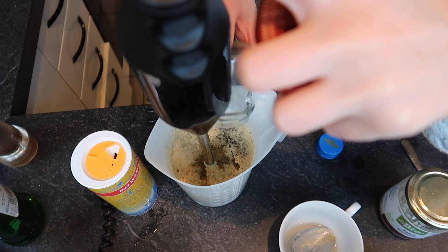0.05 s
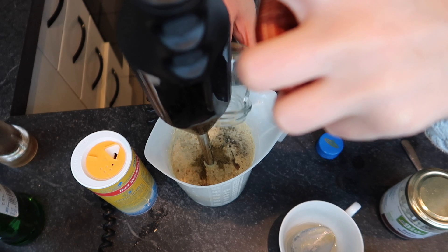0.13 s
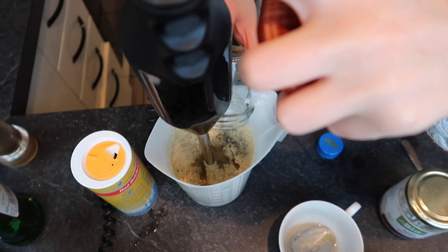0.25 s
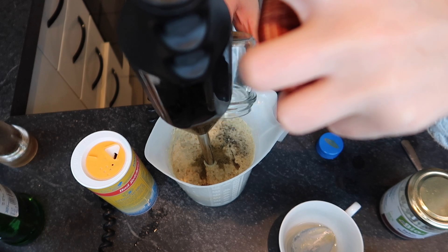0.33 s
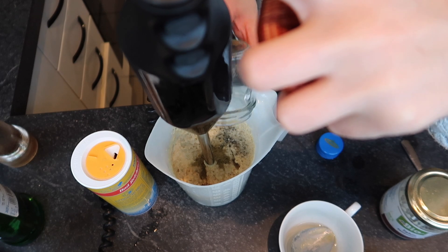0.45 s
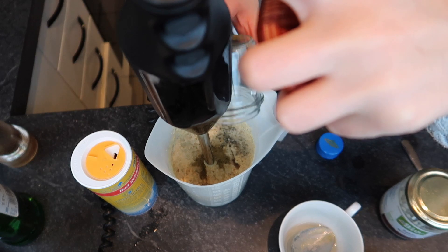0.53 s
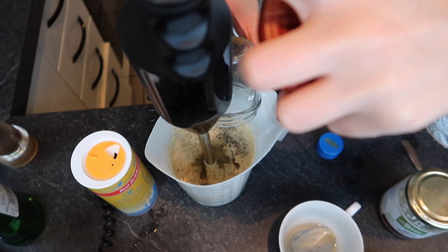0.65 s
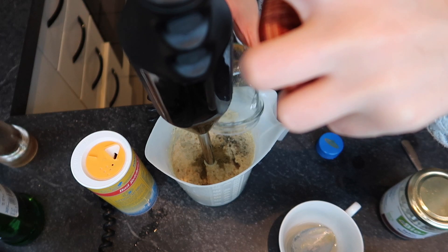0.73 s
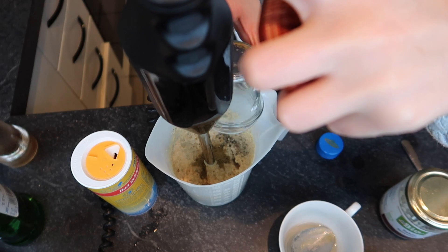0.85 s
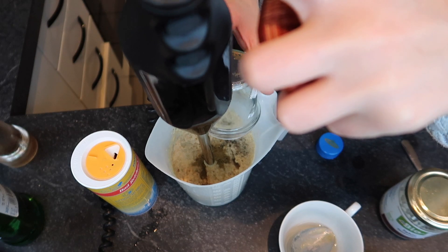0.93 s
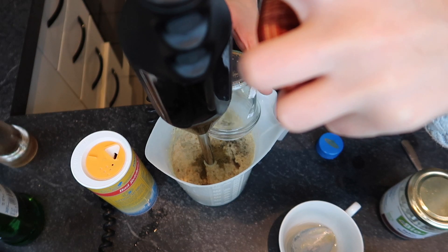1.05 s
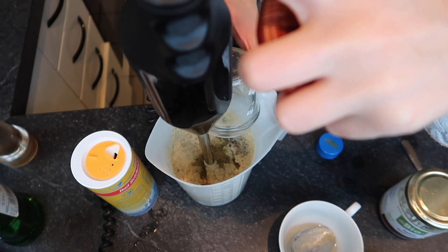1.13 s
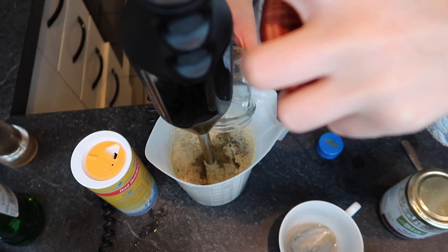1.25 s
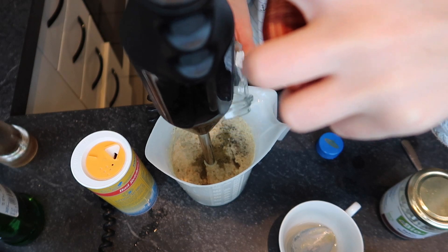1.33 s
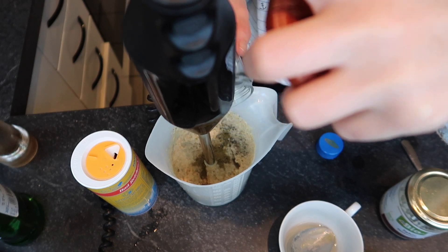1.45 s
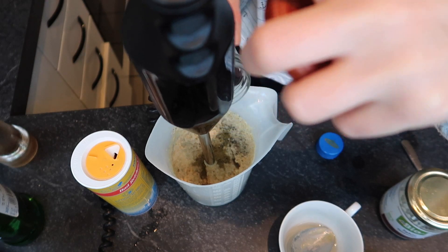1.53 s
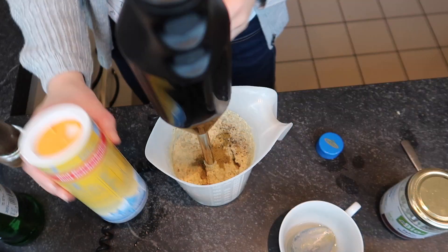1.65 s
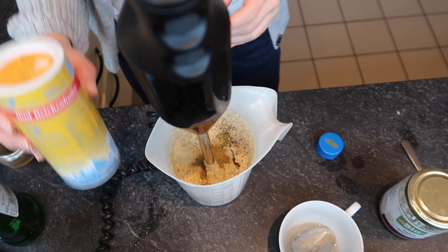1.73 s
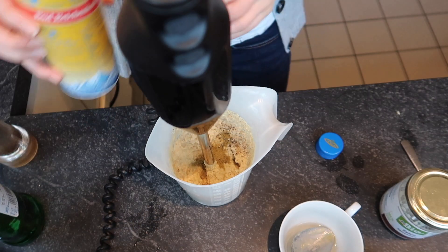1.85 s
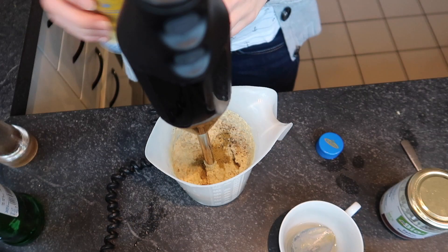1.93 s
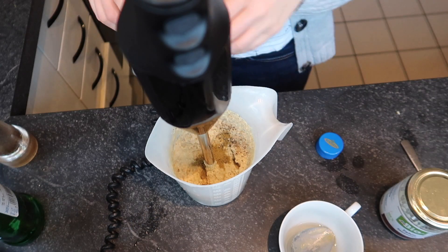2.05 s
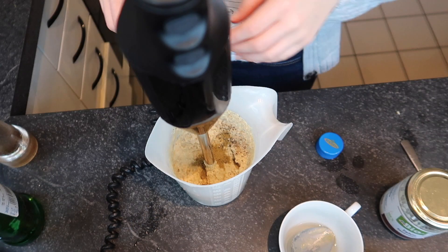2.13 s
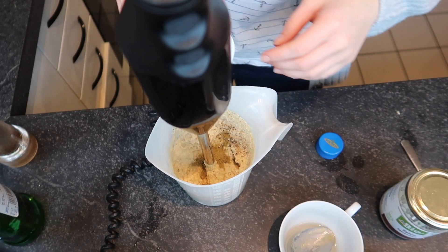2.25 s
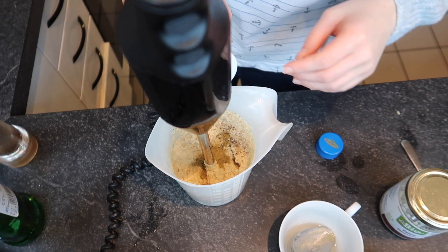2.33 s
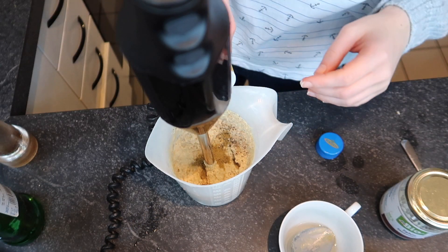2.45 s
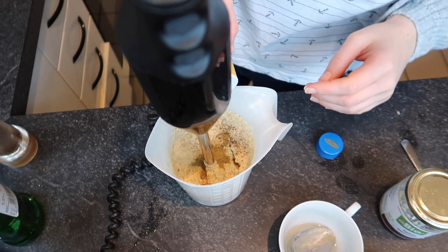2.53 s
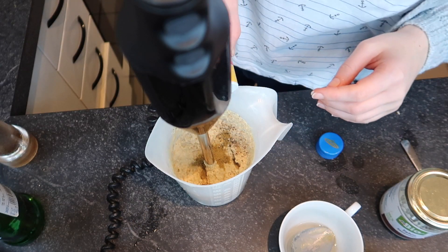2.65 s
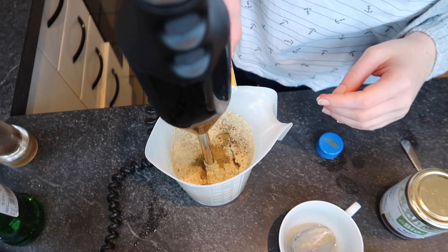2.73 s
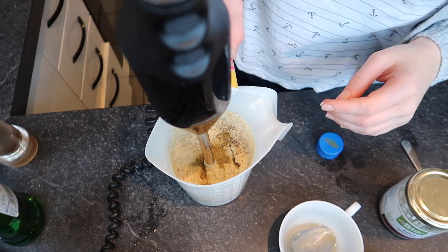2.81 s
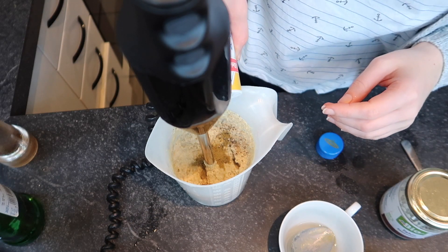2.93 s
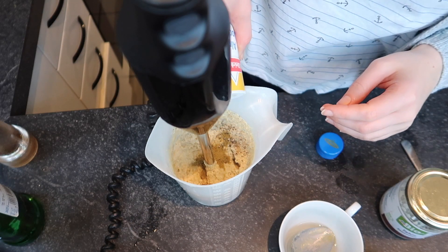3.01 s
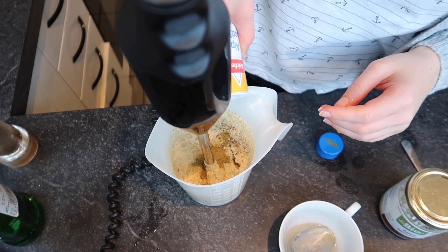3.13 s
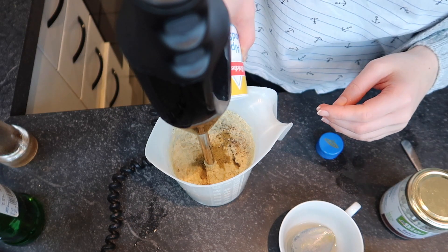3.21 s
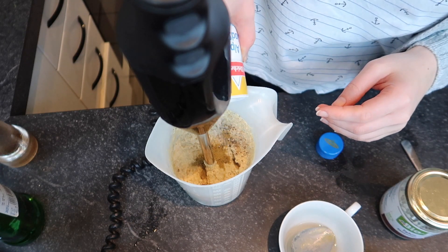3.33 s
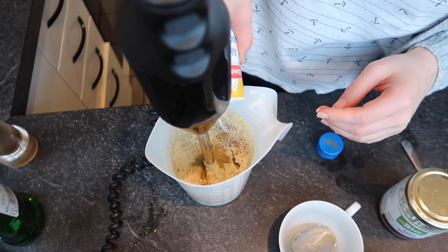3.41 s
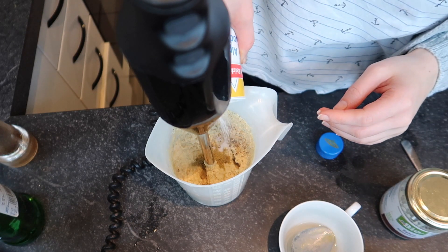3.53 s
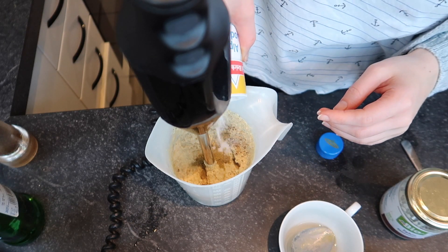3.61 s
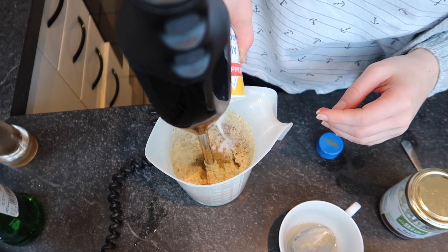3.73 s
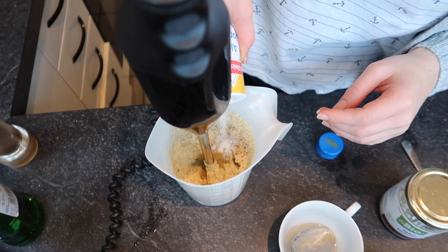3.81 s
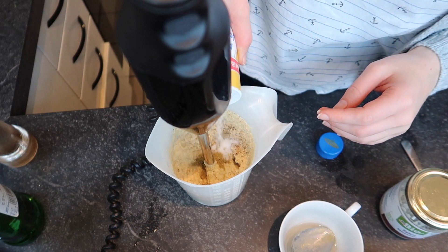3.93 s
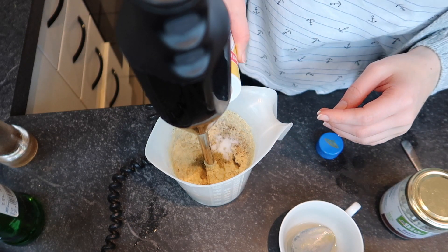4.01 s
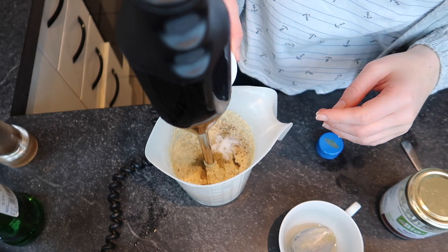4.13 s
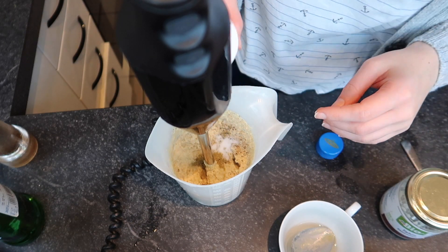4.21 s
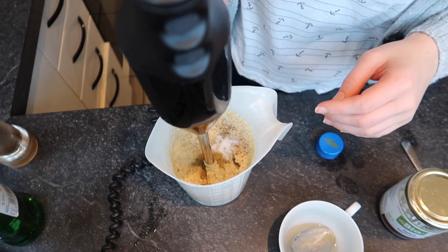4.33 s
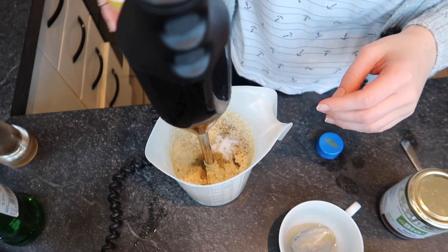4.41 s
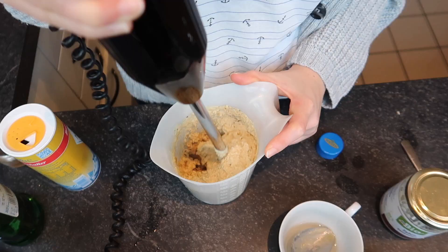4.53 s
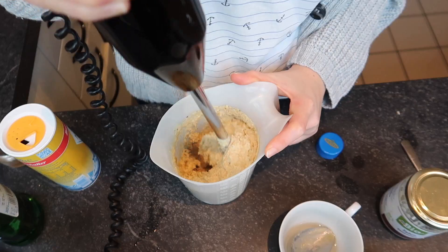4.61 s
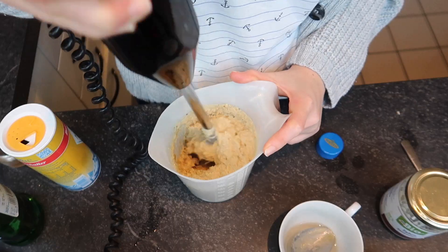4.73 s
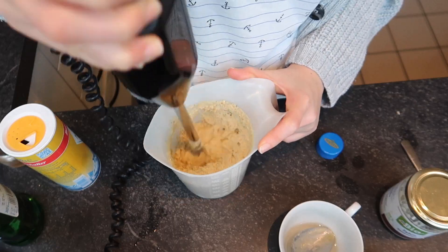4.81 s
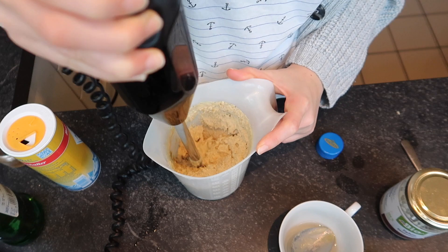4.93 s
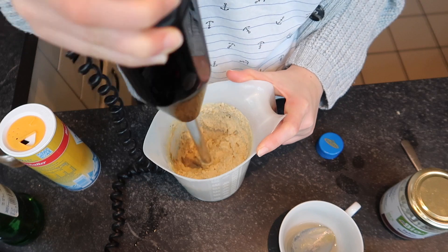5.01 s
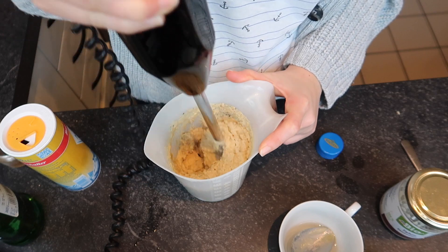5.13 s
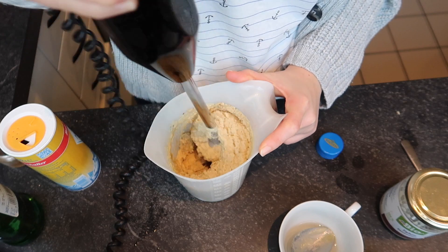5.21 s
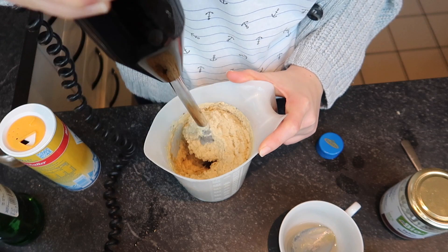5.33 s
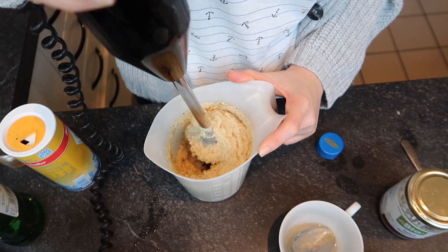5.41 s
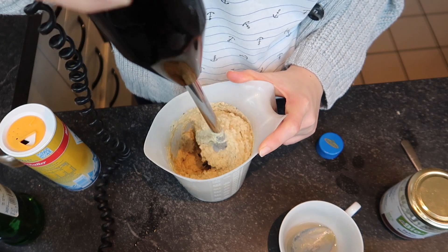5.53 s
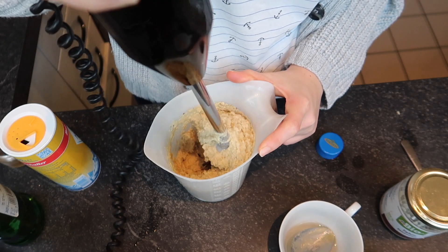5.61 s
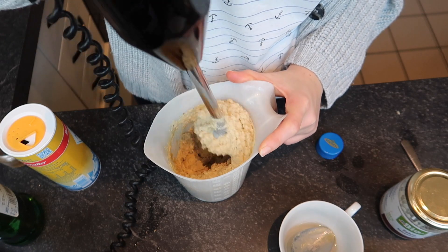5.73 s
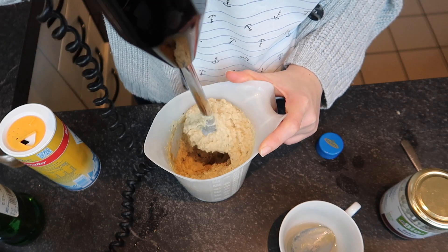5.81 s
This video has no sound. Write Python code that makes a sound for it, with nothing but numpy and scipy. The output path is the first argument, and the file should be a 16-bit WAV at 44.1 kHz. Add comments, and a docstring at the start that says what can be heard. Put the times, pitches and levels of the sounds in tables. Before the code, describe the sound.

Quick dry spice shakes with glassy knocks, soft hollow taps with fine salt fizz, then a loud labouring blender rising to a bright whine.

```python
"""A hand blender starts in thick paste, labours and spins free: harmonics of a loaded shaft, noise and impacts.
Before it, a glass spice jar is shaken over a plastic jug and knocks on the blender: struck modes and grain noise.
After two soft bumps of a handled container, a salt tub is tilted and tapped with a finger, its salt sliding:
the notes of hollows and noise swells.
A small tiled kitchen answers with decaying noise; air noise and, until the blender starts, a low hum lie beneath."""
import sys
import numpy as np
from scipy import signal
from scipy.fft import rfft, irfft, next_fast_len
from scipy.io import wavfile
from scipy.ndimage import map_coordinates

SR = 44100
rng = np.random.default_rng(int(sys.argv[2]) if len(sys.argv) > 2 else 0)


def store_pcm(level_fs):
    """Save levels as 16-bit WAV."""
    pcm = np.round(np.clip(level_fs, -1, 1) * 32767).astype(np.int16)
    wavfile.write(sys.argv[1], SR, np.atleast_2d(pcm).T)


N = 258426

# Table levels are relative: the functions apply further trims and the room.
MOTOR_ON_S = 4.605
FREE_S = 5.32  # the blade comes clear of the paste


def amp(db):
    """Logarithmic level: decibels become a gain."""
    return 10 ** (np.asarray(db) / 20)


def unit(x):
    """Power normalisation: scale to rms 1."""
    return x / np.sqrt(np.mean(x ** 2) + 1e-20)


def along(points, hz):
    """Logarithmic frequency: read (Hz, value) points on a log axis."""
    f, v = np.transpose(points)
    return np.interp(np.log(hz + 1), np.log(f + 1), v)


def clock(size=N):
    """Sampling: the time in seconds of each sample."""
    return np.arange(size) / SR


def curves(rows):
    """Linear interpolation: one value per sample for each column after the time."""
    s, *cols = np.transpose(rows)
    return [np.interp(clock(), s, c) for c in cols]


def wobble(rate):
    """Slow random fluctuation: a smooth curve with rate knots a second."""
    knots = rng.standard_normal(int(N * rate / SR) + 4)
    return map_coordinates(knots, [clock() * rate])


def swell(s, rise, fall, power=2):
    """Asymmetric envelope: peaks at s, 20 dB down one rise before and one fall after."""
    t = clock() - s
    return amp(-20 * np.maximum(-t / rise, t / fall) ** power)


def filtered(x, response):
    """Linear filtering: multiply the spectrum of x by a response of frequency."""
    size = x.shape[-1]
    m = next_fast_len(size + 8192)
    return irfft(rfft(x, m) * response(np.fft.rfftfreq(m, 1 / SR)), m)[..., :size]


def without_bass(x, cut_hz):
    """Radiation cutoff: a small object radiates little far below its lowest mode."""
    return signal.sosfilt(signal.butter(3, cut_hz, "high", fs=SR, output="sos"), x)


# likeness of left and right: frequency_hz, correlation (-1 to 1)
ALIKE = [(200, 0.992), (1000, 0.97), (2300, 0.92), (4000, 0.42), (8000, .25), (13000, 0.04)]


def spread(pair):
    """Interaural coherence: two unrelated signals become a pair alike in the bass, apart in the treble."""
    def mix(hz):
        turn = np.arccos(np.clip(along(ALIKE, hz), -1, 1)) / 2
        return np.array([np.cos(turn), np.sin(turn)])

    mid, side = filtered(pair, mix)
    return np.array([mid + side, mid - side])


def widen(pair, side_db):
    """Mid-side stereo: the level of the difference signal sets the width."""
    mid = (pair[0] + pair[1]) / 2
    side = amp(side_db) * (pair[0] - pair[1]) / 2
    return np.array([mid + side, mid - side])


def grains(colour, clump_db, clump_rate):
    """Granular noise: countless tiny impacts, arriving in clumps, make a stereo rush of rms 1."""
    clumps = amp(clump_db * np.tanh(wobble(clump_rate) / 2) * 1.6)
    impacts = rng.standard_normal((2, N)) * clumps
    return unit(spread(filtered(impacts, lambda hz: amp(along(colour, hz)))))


def add(track, s, sound):
    """Superposition: mix a sound in at s seconds."""
    part = track[..., max(round(s * SR), 0):][..., :sound.shape[-1]]
    part += sound[..., :part.shape[-1]]


def ring(modes, attack, vary_db=2):
    """Modal vibration: one blow excites decaying modes, at new strengths each time; peak 1."""
    t = clock(SR // 2)
    hz, db, t60 = np.transpose(modes)[..., None]
    strength, phase = rng.standard_normal((2, len(modes), 1))
    level = amp(db + vary_db * strength - 60 * t / t60)
    wave = np.sum(level * np.sin(2 * np.pi * hz * t + phase), 0)
    wave *= 1 - np.exp(-t / attack)
    return wave / np.abs(wave).max()


def crack(t60):
    """Contact noise: a short burst of decaying noise."""
    return amp(-60 * clock(SR // 2) / t60) * rng.standard_normal(SR // 2)


def far_wall(x, echo_db, delay, dull_hz):
    """Single reflection: the far wall returns the low part of a sound a moment later."""
    def reflection(hz):
        return np.exp(-2j * np.pi * hz * delay) / (1 + (hz / dull_hz) ** 2)

    return x + amp(echo_db) * filtered(x, reflection)


# kitchen decay: frequency_hz, t60_s
KITCHEN = [(120, 0.27), (400, 0.28), (1000, 0.24), (3000, 0.28), (7000, 0.092), (14000, 0.16)]


def kitchen(x, wet_db, build=0.0034):
    """Reverberation: worktop and tiles answer, each frequency dying at its own speed."""
    hz, t, z = signal.stft(rng.standard_normal((2, SR // 2)), SR, nperseg=256)
    decay = amp(-60 * t / along(KITCHEN, hz)[:, None])
    tail = signal.istft(z * decay, SR, nperseg=256)[1]
    tail = spread(tail * (1 - np.exp(-clock(tail.shape[1]) / build)))
    echo = signal.fftconvolve(np.atleast_2d(x), tail / np.linalg.norm(tail[0]), axes=1)
    return x + amp(wet_db) * echo[:, :x.shape[-1]]


# air noise over time: time_s, level_db
ROOM_TONE = [(0, -68.5), (1.6, -66), (1.75, -74), (2.1, -67.5), (2.5, -63), (3.1, -62), (4.2, -67),
             (5.8, -61.5)]
# spectrum of the air: frequency_hz, level_db_per_hz
AIR = [(60, -1.5), (150, 0), (350, 2.5), (800, -6), (2000, -9), (4000, -13), (8000, -24), (13000, -23.5),
       (15500, -40)]


def background():
    """Stationary noise plus a tone: kitchen air and a hum until the blender starts; the level dips briefly."""
    air_db, = curves(ROOM_TONE)
    air = unit(spread(filtered(rng.standard_normal((2, N)), lambda hz: amp(along(AIR, hz)))))
    hum = amp(-65.5 + 0.67 * wobble(9.4)) * np.sin(2 * np.pi * 49 * clock())
    hum *= np.clip((MOTOR_ON_S - clock()) / 0.023, 0, 1)
    dip = amp(-18 * np.exp(-((clock() - 1.708) / .012) ** 2))
    return dip * (hum + amp(air_db) * air)


# clicks of the tub's plastic lid: start_s, level_db
CLICKS = [(2.062, -52), (2.278, -26.5)]
# modes of the lid: pitch_hz, level_db, t60_s
LID = [(692, -13, 0.018), (940, -13, 0.027), (1684, -2.5, 0.0099), (2010, 4.5, .008), (2360, 3.5, 0.01),
       (2700, -7.5, 0.017), (3280, -8, 0.0084), (5100, -12.5, 0.0096)]


def lid_clicks():
    """Modal vibration of a thin plate: the plastic snaps."""
    out = np.zeros((2, N))
    for s, db in CLICKS:
        snap = ring(LID, attack=0.00082) + 0.022 * crack(0.0038)
        add(out, s + 0.0017, kitchen(amp(db - 1.5) * snap, wet_db=-7.0))
    return out


# two soft bumps of a handled container, then finger taps on the tub:
# start_s, thump_level_db, tick_db (above thump), hollow_pitch_hz, hollow_db (above thump)
BUMPS_AND_TAPS = [(1.471, -47.5, -19, 200, -3.5), (1.617, -45, -25, 189.3, 0.5),
                  (2.67, -24, -19, 219.4, -9.5), (2.852, -25.5, -15, 215, -7), (3.019, -22.5, -14, 194, -7),
                  (3.179, -22.5, -11.5, 174, -4), (3.337, -18, -8.5, 174, -3.5),
                  (3.501, -19, -9.5, 170, -4.5), (3.657, -29.5, -8, 167, 1), (3.797, -19.5, -8.5, 168, -4),
                  (3.996, -37, -13.5, 173, -2)]
# modes of the container's body: pitch_hz, level_db, t60_s
CONTAINER_BODY = [(315, -6, 0.031), (410, 2, 0.018), (581, -0.5, 0.013), (743, -7, 0.02)]
# modes of the container's wall: pitch_hz, level_db, t60_s
CONTAINER_WALL = [(914, -6.5, 0.04), (1312, -9.5, 0.053), (1490, -7, 0.011), (2100, 13, 0.0082),
                  (2385, 6, 0.011), (2910, -9.5, 0.011), (4460, -10, 0.013)]
HOLLOW_T60_S = 0.036


def bumps_and_taps():
    """Cavity and wall resonance: two soft bumps of a handled container, then finger taps on the tub.

    Each thumps a hollow and ticks; over the taps the note mostly deepens as the salt runs forward."""
    out = np.zeros((2, N))
    for s, db, tick_db, hollow_hz, hollow_db in BUMPS_AND_TAPS:
        hollow = amp(db + hollow_db) * ring([(hollow_hz, 0, HOLLOW_T60_S)], attack=0.0026)
        body = ring(CONTAINER_BODY, attack=0.0046, vary_db=0.5)
        thump = without_bass(hollow, cut_hz=104) + amp(db - 3.0) * without_bass(body, cut_hz=277)
        thump = far_wall(thump, echo_db=-3.5, delay=.047, dull_hz=260)
        tick = amp(db + tick_db + 2.5) * (ring(CONTAINER_WALL, attack=0.00069) + .06 * crack(0.012))
        add(out, s + 0.00083, kitchen(thump, wet_db=-8.5) + kitchen(tick, wet_db=-13))
    return out


# salt slides as the tub tilts: peak_s, rise_s, fall_s, slide_level_db, fizz_db (above slide)
TILTS = [(2.43, 0.1, 0.28, -63, 6), (2.762, 0.052, 0.058, -59, -18), (2.93, 0.17, .21, -69, 7),
         (4.35, .08, 0.11, -53, 4.5), (4.47, 0.12, 0.2, -45.5, 2.5)]
# spectrum of sliding crystals: frequency_hz, level_db_per_hz
SALT_HISS = [(1200, -57), (1900, -9), (2600, 1.5), (4600, 0.5), (7000, -2), (10000, -32.5)]
# spectrum of the finest stream: frequency_hz, level_db_per_hz
SALT_FIZZ = [(5000, -18), (8000, -4.5), (10000, -5), (12500, 1), (14000, -1.5), (15700, -11.5)]
# spectrum of crystals landing on the wall: frequency_hz, level_db_per_hz
SALT_RATTLE = [(400, -12), (900, 0), (1350, 1.5), (1750, -3.5), (2300, -3), (3200, -10.5), (5000, -10),
               (7000, -22), (11000, -37)]
JOLT_RISE_S, JOLT_FALL_S, LANDING_T60_S = 0.036, 0.058, 0.14  # grains jump with each bump or tap and land
JOLT_FIZZ_DB, LANDING_DB = -18.5, -2  # for a 0 dB tick
JOLT_GROWS = 1.34  # dB per dB of tick


def salt():
    """Granular flow: crystals slide at each tilt; each bump or tap adds a fine fizz and a landing rattle."""
    slide, fizz, rattle = np.zeros((3, N))
    for s, rise, fall, db, fizz_db in TILTS:
        flow = amp(db) * swell(s, rise, fall)
        slide += flow
        fizz += amp(fizz_db) * flow
    for s, db, tick_db, *_ in BUMPS_AND_TAPS:
        jolt = amp(JOLT_GROWS * (db + tick_db))
        t = clock() - s
        fizz += amp(JOLT_FIZZ_DB) * jolt * swell(s, JOLT_RISE_S, JOLT_FALL_S, power=1.3)
        rattle += amp(LANDING_DB) * jolt * (t > 0) * amp(-60 * np.abs(t) / LANDING_T60_S)
    landing = kitchen(rattle * grains(SALT_RATTLE, clump_db=5, clump_rate=700), wet_db=-9)
    hiss = slide * grains(SALT_HISS, clump_db=4.5, clump_rate=4300)
    return landing + hiss + fizz * grains(SALT_FIZZ, clump_db=1.5, clump_rate=900)


# throws of spice along the jar: start_s, level_db, note_db (jar's lowest note above the throw)
SHAKES = [(0.029, -28.5, -19), (0.191, -20, -5), (0.355, -19, -14), (0.524, -21, -7.5),
          (0.692, -24.5, -28.5), (0.859, -28, -13.5), (1.021, -23.5, -2), (1.16, -24.5, -2)]
# modes of the jar in the hand: pitch_hz, width_hz, level_db
HELD_JAR = [(1098, 26, 12), (2090, 60, 8), (4010, 30, 15)]
# spectrum of the thrown spice: frequency_hz, level_db_per_hz
SPICE = [(60, -21), (130, 0.5), (200, -2), (450, -3.5), (750, -2.5), (950, -8), (1120, -10.5),
         (1500, -14.5), (2300, -15), (4000, -24), (6000, -41)]
# spectrum of its dust: frequency_hz, level_db_per_hz
FIZZ = [(1500, -27), (4000, -2.5), (7000, 3.5), (10000, -6.5), (13000, -25), (16000, -37.5)]
GATHER_S, SETTLE_T60_S, FIZZ_T60_S = 0.024, 0.15, 0.26  # a throw builds, its lumps settle, its dust settles
FIZZ_DB, FIZZ_GROWS = -42.5, 0.36  # dust of a 0 dB throw; dB per dB of throw


def held_jar(hz):
    """Damped resonance: the response of the modes that the gripping hand leaves free."""
    total = 0
    for mode_hz, width, db in HELD_JAR:
        damping = 1j * hz * width
        total = total + amp(db) * damping / (mode_hz * mode_hz - hz * hz + damping)
    return total


def spice():
    """Granular excitation: each shake gathers the spice, throws it on the glass and lets it settle."""
    body, fizz = np.zeros((2, N))
    for s, db, _ in SHAKES:
        before, after = np.minimum(clock() - s, 0), np.maximum(clock() - s, 0)
        gather = amp(-20 * (before / GATHER_S) ** 2)
        body += amp(db - 6.5) * gather * amp(-60 * after / SETTLE_T60_S)
        fizz += amp(FIZZ_DB + FIZZ_GROWS * db) * gather * amp(-60 * after / FIZZ_T60_S)
    glass = filtered(body * rng.standard_normal(N), held_jar)
    powder = grains(SPICE, clump_db=3, clump_rate=450)
    rattle = far_wall(body * powder, echo_db=-3.0, delay=0.046, dull_hz=900)
    dust = fizz * grains(FIZZ, clump_db=1.0, clump_rate=210)
    return kitchen(rattle + dust, wet_db=-9.5) + kitchen(glass, wet_db=-13.5)


# lowest note of the jar: pitch_hz, level_db, t60_s
JAR_NOTE = [(1110, 0, .17)]
# clods dropping into the jug: start_s, level_db
CLODS = [(0.041, -31), (0.372, -26.5), (0.698, -23), (0.722, -27.5), (0.857, -30), (0.885, -25)]
# modes woken by a clod: pitch_hz, level_db, t60_s
CLOD = [(163, -0.5, 0.096), (212, -4, 0.052)]
LUMP_COUNT, PATTER_S, LUMP_DB, LUMP_FADE_DB_PER_S = 12, .1, -6, 120
LUMP_HZ, LUMP_SPREAD = 570, .3  # typical pitch of a lump, and its log scatter


def lumps():
    """Impact pulses: each throw rings the jar's lowest note and patters; big clods thump into the jug."""
    out, t = np.zeros(N), clock(SR // 20)
    for s, db, note_db in SHAKES:
        add(out, s - .004, amp(db + note_db) * ring(JAR_NOTE, attack=0.0015))
        for k, (jitter, pitch, size) in enumerate(rng.standard_normal((LUMP_COUNT, 3))):
            late = PATTER_S * (k + .4 * jitter) / LUMP_COUNT
            cycles = LUMP_HZ * np.exp(LUMP_SPREAD * pitch) * t
            lump = np.sin(2 * np.pi * cycles) * cycles * np.exp(1 - cycles)
            lump_db = db + LUMP_DB + 2 * size - LUMP_FADE_DB_PER_S * late
            add(out, s + late, amp(lump_db) * lump)
    clods = np.zeros(N)
    for s, db in CLODS:
        add(clods, s, amp(db) * ring(CLOD, attack=0.0037))
    clods = far_wall(clods, echo_db=-12, delay=0.095, dull_hz=320)
    return kitchen(out, wet_db=-11.5) + kitchen(clods, wet_db=-14.5)


# long ring of the jar: pitch_hz, level_db, t60_s
GLASS = [(1140, -6, 0.14), (1490, -16, 0.3), (3580, -19, .2), (3980, -12, 0.36), (4190, -7, 0.35),
         (4700, -17, .27), (5050, -16, 0.3), (6130, -20, 0.29), (7900, -17, 0.25), (10250, -12, .19)]
WASH_DB, WASH_T60_S = -4, .33  # its countless weaker modes merge into a wash


def glass_ring(smear_db, smear_rate):
    """Modulated modes: the jar's long ring, unsteady in level and phase as it moves in the hand."""
    t = clock(SR // 2)
    hz, db, t60 = np.transpose(GLASS)[..., None]
    knots = rng.standard_normal((len(GLASS), SR // 50))
    drift = np.array([map_coordinates(row, [t * smear_rate]) for row in knots])
    level = amp(db + 4.6 * drift[:, ::-1] - 60 * t / t60)  # reversed, so level and phase drift apart
    wave = level * np.sin(2 * np.pi * hz * t + amp(smear_db) * drift)
    wash = filtered(amp(WASH_DB) * crack(WASH_T60_S), lambda hz: 1 / (1 + (hz / 5200) ** 4))
    return (wave.sum(0) + wash) * (1 - np.exp(-t / 0.00057))


# jar strikes blender: start_s, thud_level_db, clack_db (above thud), clack_edge_hz, ring_db (above clack)
KNOCKS = [(0.027, -28.5, 6, 5670, -34), (0.185, -19.5, 8.5, 5730, -27), (0.355, -17, 5.5, 6900, -24.5),
          (0.445, -18.5, 3.5, 2340, -18.5), (0.489, -35.5, 14.5, 9000, -26), (0.515, -18, 2, 2200, -30),
          (0.532, -21, 2.5, 4900, -41.5), (0.695, -18.5, -9, 5087, -29.5), (0.859, -21.5, -20, 2990, -32),
          (1.022, -11.5, 12, 5926, -20), (1.115, -24, 16, 2528, -12.5), (1.152, -11.5, -4, 4500, -23.5),
          (1.158, -7, 11, 5540, -21.5), (1.358, -39, 20, 1300, -19)]
# modes of the blender housing: pitch_hz, level_db, t60_s
BLENDER_BODY = [(175.8, -21.5, 0.2), (355, -7.5, 0.063), (478, 4.5, 0.021), (658, -4, 0.023)]
# short modes of the jar: pitch_hz, level_db, t60_s
JAR = [(940, -7.5, 0.021), (1520, 3.5, 0.0052), (2145, 5, 0.0052), (3360, -3.5, 0.0097),
       (4540, 1.5, 0.0023), (4740, -1, 0.0074), (6200, -14.5, 0.013), (11000, -32, 0.0074)]


def jar_knocks():
    """Collision of two bodies: the housing thuds, the glass clacks and rings on, each under its own treble edge."""
    out = np.zeros((2, N))
    for s, db, clack_db, edge_hz, ring_db in KNOCKS:
        thud = amp(db - 1) * without_bass(ring(BLENDER_BODY, attack=.001), cut_hz=200)
        clack = amp(db + clack_db - 3) * (ring(JAR, attack=0.00024) + .5 * crack(0.0037))
        singing = amp(db + clack_db + ring_db) * glass_ring(smear_db=3, smear_rate=200)
        glass = np.array([clack, singing])
        clack, singing = filtered(glass, lambda hz: 1 / (1 + (hz / edge_hz) ** 3))
        knock = kitchen(thud, wet_db=-9.5) + kitchen(clack, wet_db=-7) + kitchen(singing, wet_db=-5.5)
        add(out, s + 0.00093, knock)
    return out


# crumbs flung at the jug wall: start_s, level_db
PINGS = [(4.756, -23.5), (4.81, -14), (4.839, -18.5), (4.881, -17.5), (4.92, -12), (5.169, -15.5),
         (5.189, -12), (5.208, -18)]
# modes of that wall: pitch_hz, level_db, t60_s
JUG_WALL = [(3810, -2.5, 0.012), (4920, -13, 0.0071), (6510, -5, 0.013), (7250, -3.5, 0.0059)]


def pings():
    """Modal impact: hard crumbs snap against the jug wall."""
    out = np.zeros(N)
    for s, db in PINGS:
        add(out, s, amp(db) * (ring(JUG_WALL, attack=0.00032) + 0.26 * crack(.008)))
    return kitchen(out, wet_db=-4.5)


# blade hits big lumps: start_s, gulp_level_db, smack_db (above gulp)
CHOPS = [(4.674, -24, 10.5), (4.732, -18, 2), (4.757, -4.5, 0), (4.774, -9.5, 1), (4.798, -11.5, 2.5),
         (4.811, -15.5, 4.5), (4.838, 2.5, -13.5), (4.863, -4, -9), (4.883, 0.5, -9), (4.912, 0, -22),
         (4.923, -3, -18.5), (4.931, -7.5, -18.5), (4.974, -13.5, -10.5), (5.065, -17, -0.5),
         (5.083, -12.5, -3.5), (5.096, -10.5, -4), (5.17, -4.5, -11), (5.188, -8, -7.5),
         (5.208, -8.5, -5.5)]
# modes of the jug: pitch_hz, level_db, t60_s
JUG = [(536, -35, 0.016), (674.5, -2, 0.066), (957, 9.5, 0.017), (1060, 5, 0.027)]
# modes of the steel guard: pitch_hz, level_db, t60_s
BLADE = [(1844, -5, 0.013), (2220, -3.5, 0.011), (2860, -23, 0.027), (3930, -17, 0.0073),
         (6180, -34.5, 0.013)]


def chops():
    """Coupled impact: a lump caught by the blade gulps in the jug and smacks the steel guard."""
    out = np.zeros((2, N))
    for s, db, smack_db in CHOPS:
        gulp = amp(db - 10.5) * ring(JUG, attack=0.0058)
        smack = amp(db + smack_db - 2.5) * (ring(BLADE, attack=0.00075) + 0.11 * crack(0.029))
        add(out, s + 0.0013, kitchen(gulp + smack, wet_db=-1.5))
    return out


# blade at work in the paste: time_s, churn_level_db, grind_level_db
PASTE = [(4.62, -29, -26.5), (4.662, -44.5, -29.5), (4.745, -29, -21.5), (4.77, -26.5, -19.5),
         (4.91, -15, -26.5), (5.056, -25, -29.5), (5.086, -15, -17.5), (5.132, -28, -26),
         (5.176, -18.5, -20), (5.328, -40, -40.5), (5.42, -45, -42), (5.8, -39, -37.5), (5.845, -32.5, -34)]
CRUMB_COUNT, CRUMB_DB = 22, 8  # level relative to the grinding


def crumbs():
    """Random impacts: small lumps tick on the guard for as long as the blade is in the paste."""
    _, grind_db = curves(PASTE)
    out = np.zeros(N)
    for s in rng.uniform(MOTOR_ON_S, FREE_S, CRUMB_COUNT):
        add(out, s, amp(CRUMB_DB) * ring(BLADE, attack=0.0019))
    return kitchen(amp(grind_db) * out, wet_db=-7.0)


def strain():
    """Mechanical load: how hard the blade labours, 0-1."""
    return swell(4.98, rise=.3, fall=.27)


# motor speed: time_s, turns_per_s
SPEED = [(4.62, 251.5), (4.68, 259.5), (4.77, 266.5), (4.88, 259), (4.98, 234), (5.1, 231), (5.18, 235.3),
         (5.225, 239), (5.28, 247), (5.39, 260.3), (5.5, 270.5), (5.64, 279.5), (5.85, 284.3)]


def shaft_angle():
    """Phase as integrated speed: load slows the motor; strain judders it, smearing high tones into a rasp."""
    speed_hz, = curves(SPEED)
    judder = .17 * strain() * wobble(260)
    return 2 * np.pi * np.cumsum(speed_hz * (1 + 0.00088 * wobble(50))) / SR + judder


WHINE_DB, SHAKE_ABOVE_HZ, WHINE_DB_PER_HZ = -35.5, 266.2, 0.695  # grows once the shaft starts to shake


def whine_level():
    """Speed-dependent radiation: the motor's level in dB is steady at low speed and grows as it spins up."""
    speed_hz, = curves(SPEED)
    return WHINE_DB + WHINE_DB_PER_HZ * np.maximum(speed_hz - SHAKE_ABOVE_HZ, 0)


# bursts of spray: peak_s, rise_s, fall_s, level_db
SPRAYS = [(4.889, 0.16, 0.038, -27), (5.191, 0.082, 0.14, -38), (5.65, 0.047, 0.18, -40)]
# spectrum of the churning: frequency_hz, level_db_per_hz
CHURN = [(70, -20), (130, -47), (300, -5.5), (500, -1), (700, 7), (1100, 0.5), (1400, -5), (2000, -45)]
# spectrum of the grinding: frequency_hz, level_db_per_hz
GRIND = [(900, -36), (1400, -7.5), (1850, -1), (2250, -0.5), (2800, -8), (4100, -9.5), (5200, -23),
         (7000, -38)]
# spectrum of the spray: frequency_hz, level_db_per_hz
SPRAY = [(3000, -6.5), (5000, -3.5), (7000, -4.5), (9000, -8), (13500, -11.5), (15700, -25.5)]
# spectrum of the jug shaken by the labouring blender: frequency_hz, level_db_per_hz
RUMBLE = [(60, -26), (120, 6), (180, 1), (260, -6.5), (450, -38.5)]
# spectrum of the shaft whirring in its guard: frequency_hz, level_db_per_hz
WHIRR = [(1600, -32), (1950, -5), (2100, -1.5), (2400, -22), (2800, -37.5)]
FREE_GRIND_DB, FREE_SPRAY_DB, WHIRR_DB = -12.5, -21, -13  # relative to the whine
LABOUR_DB = -36  # rumble at the worst strain
CLEARING_DB_PER_S = 4.5  # the blade flings off the last paste once it is free


def paste(angle):
    """Amplitude-modulated noise: grit grinds and spray flies in step with the shaft.

    The blade also churns the jug's hollow, the shaft whirrs, and the jug rumbles while the motor labours."""
    churn_db, grind_db = curves(PASTE) - CLEARING_DB_PER_S * np.maximum(clock() - FREE_S, 0)
    whine_db = whine_level()
    turning = unit(amp(3.6 * np.cos(angle)))
    flung = sum(amp(db) * swell(s, rise, fall) for s, rise, fall, db in SPRAYS)
    grind_level = amp(grind_db - 7.0) + amp(whine_db + FREE_GRIND_DB)
    spray_level = flung + amp(whine_db + FREE_SPRAY_DB)
    churn = amp(churn_db - 5.5) * grains(CHURN, clump_db=3.0, clump_rate=310)
    grind = grind_level * grains(GRIND, clump_db=9.5, clump_rate=270)
    spray = spray_level * grains(SPRAY, clump_db=4.5, clump_rate=500)
    rumble = amp(LABOUR_DB) * strain() ** 2 * grains(RUMBLE, clump_db=16.0, clump_rate=37)
    whirr = amp(whine_db + WHIRR_DB) * grains(WHIRR, clump_db=4.5, clump_rate=44)
    return kitchen(churn + rumble + whirr + turning * (grind + spray), wet_db=-5.5)


# spectrum of the brushes on the commutator: frequency_hz, level_db_per_hz
BUZZ = [(1200, 11.5), (2200, 3), (4500, -4.5), (6500, -1.5), (10000, -27), (13500, 2), (15700, -27)]
BUZZ_DB = -18.5  # relative to the whine


def brushes(angle, count=128):
    """Periodic friction: brushes scrape the same rough track each turn, chattering into a dense, bright buzz."""
    chatter = .045 * wobble(220)
    place = (angle + chatter) / (2 * np.pi) % 1 * count
    scrape = map_coordinates(rng.standard_normal(count), [place], mode="grid-wrap")
    buzz = unit(filtered(scrape, lambda hz: amp(along(BUZZ, hz))))
    return kitchen(amp(whine_level() + BUZZ_DB + 2.6 * wobble(17)) * buzz, wet_db=2.5)


UNBALANCE_DB, UNBALANCE_DB_PER_HZ = -34, .55  # level at top speed; growth per turn a second
FREEING_S = 0.07  # how long coming clear takes


def unbalance(angle):
    """Rotating imbalance: the shaft pulls on the housing once a turn, harder the faster it goes."""
    speed_hz, = curves(SPEED)
    free = np.clip((clock() - FREE_S) / FREEING_S, .3, 1)  # the paste steadies the shaft
    level_db = UNBALANCE_DB + UNBALANCE_DB_PER_HZ * (speed_hz - speed_hz.max()) + 0.25 * wobble(9.1)
    return free * amp(level_db) * np.sin(angle)


# shaft tones: multiple_of_speed, level_db
SHAFT = [(2, 1.5), (3, -8), (4, 2.5), (5, -1), (6, -6.5), (7, -8), (8, -1), (9, -13), (10, -10), (11, -9),
         (12, -8), (13, -21), (14, -23), (15, -27), (16, -9), (17, -21)]
# commutator tones: multiple_of_speed, level_db
COMMUTATOR = [(20, -19.5), (24, -12.5), (30, -48.5), (32, -13.5), (48, -27.5)]
# tones that swell with the motor current: multiple_of_speed
MAGNETIC = (2, 16)
# tones of the twin blade: multiple_of_speed
BLADE_TONES = (2, 4, 8)
# resonances of the motor housing: pitch_hz, width_hz, level_db
HOUSING = [(2100, 85, 13), (3603, 50, 15), (3960, 105, 14)]
LOAD_HUM_DB, UNLOADING_S = 13.5, 0.17  # hum gained at full load; time the load takes to ease
SAG_S, SAG_WIDTH_S, SAG_DB = 5.7, 0.091, -8.5  # the blade's tones sag briefly


def motor(angle):
    """Harmonic series of a rotor: fluttering tones swell as they glide through the housing's resonances.

    Load swells the magnetic hum, and the blade's tones sag once."""
    speed_hz, = curves(SPEED)
    load = np.clip(.5 + (FREE_S - clock()) / UNLOADING_S, 0, 1)
    sag = SAG_DB * swell(SAG_S, SAG_WIDTH_S, SAG_WIDTH_S)
    tones = np.zeros(N)
    for k, db in SHAFT + COMMUTATOR:
        hum_db = LOAD_HUM_DB * load * (k in MAGNETIC)
        sag_db = sag * (k in BLADE_TONES)
        housing_db = sum(peak / (1 + ((k * speed_hz - hz) / width) ** 2) for hz, width, peak in HOUSING)
        flutter_db = 2 * wobble(22)
        phase = k * angle + .02 * k * wobble(90) + 2 * np.pi * rng.random()
        tones += amp(db + hum_db + sag_db + housing_db + flutter_db) * np.sin(phase)
    return unbalance(angle) + kitchen(amp(whine_level() - 10.5) * tones, wet_db=-12)


def scene():
    """Superposition of sources: spice, then salt, then the blender, over the background."""
    angle = shaft_angle()
    switched_on = np.clip((clock() - MOTOR_ON_S) / 0.067, 0, 1) ** 2
    working = motor(angle) + brushes(angle) + paste(angle) + chops() + pings() + crumbs()
    blender = without_bass(switched_on * working, cut_hz=135)
    jar = without_bass(jar_knocks(), cut_hz=98) + spice() + lumps()
    handling = bumps_and_taps() + lid_clicks()
    containers = widen(jar, side_db=3.0) + widen(handling, side_db=10) + widen(salt(), side_db=2.0)
    return containers + widen(blender, side_db=-3.5) + background()


def record(dry):
    """Band limitation: the deepest bass and top treble roll off, and nothing remains above the band limit."""
    soft = filtered(without_bass(dry, cut_hz=11), lambda hz: 1 / np.sqrt(1 + (hz / 15000) ** 24))
    return filtered(soft, lambda hz: hz < 15750)


dry = scene()
out = record(dry)
store_pcm(out)
```